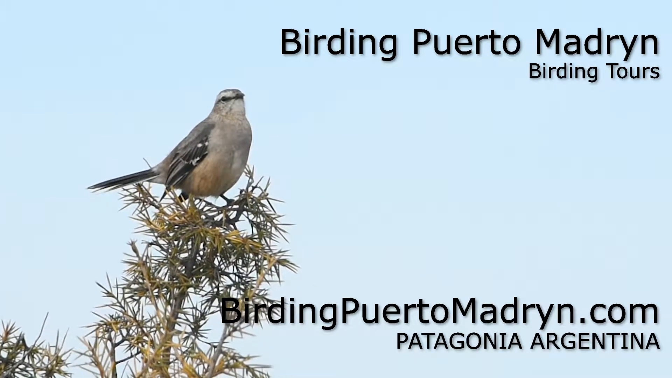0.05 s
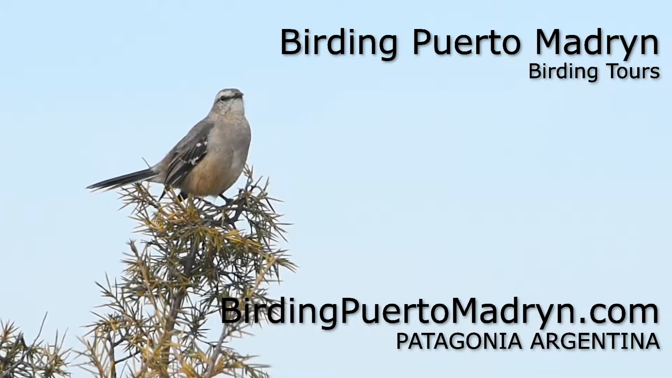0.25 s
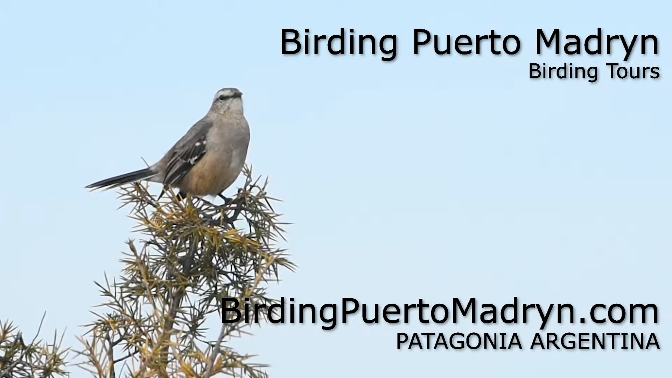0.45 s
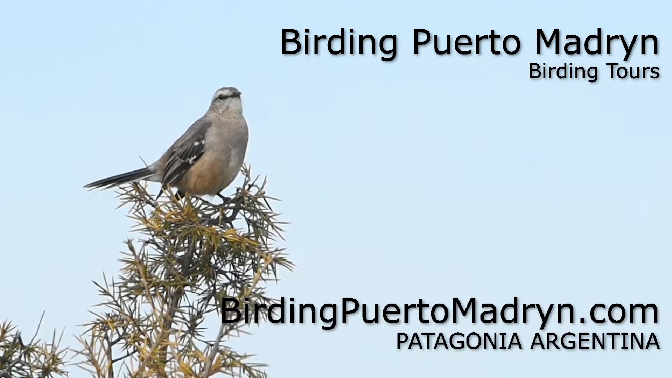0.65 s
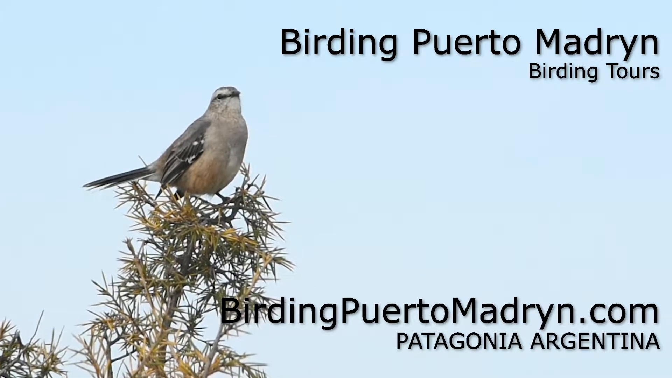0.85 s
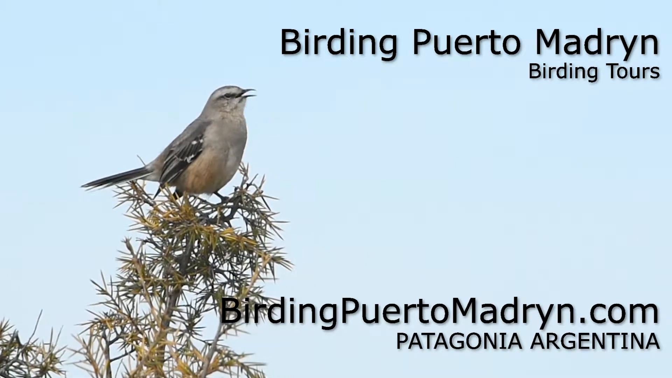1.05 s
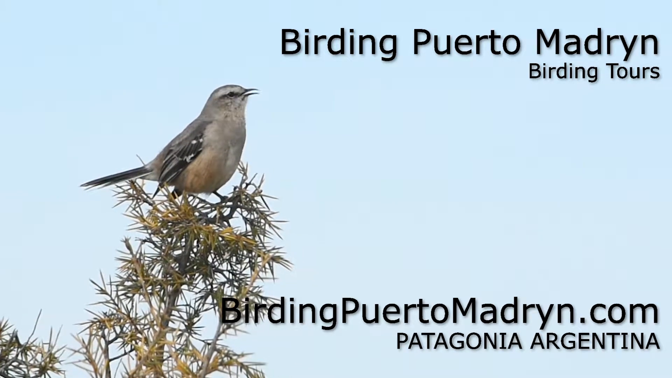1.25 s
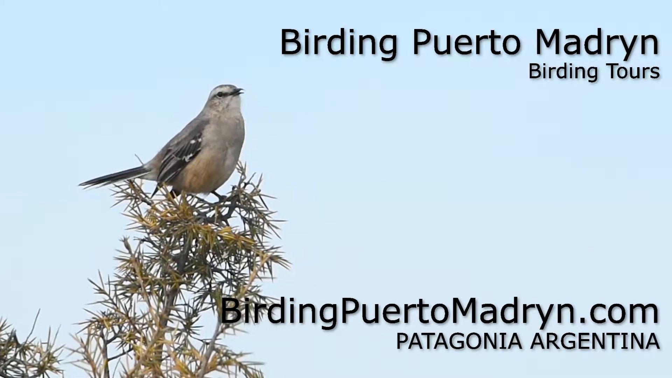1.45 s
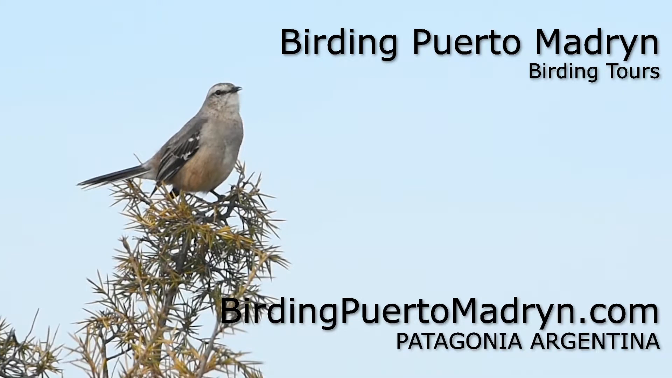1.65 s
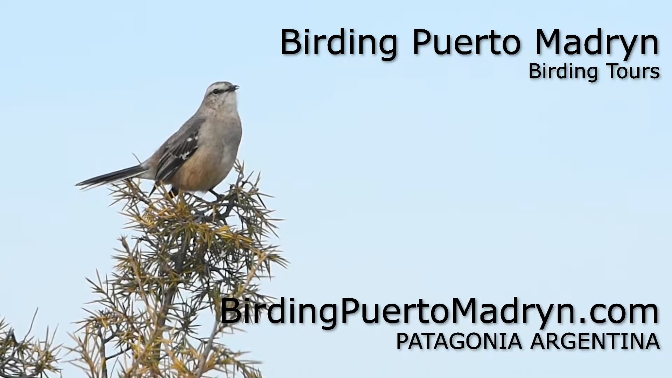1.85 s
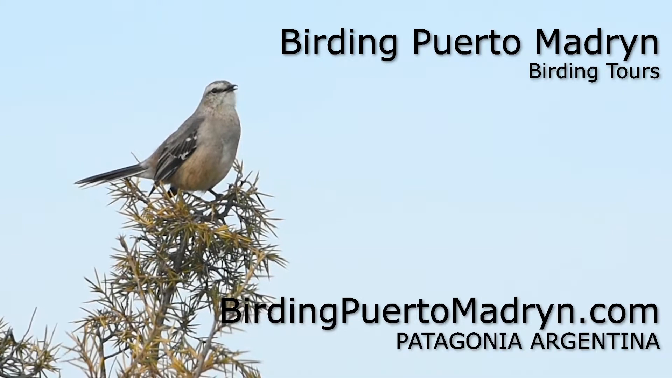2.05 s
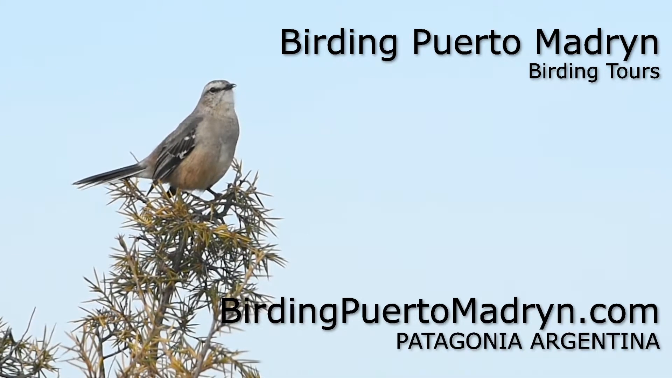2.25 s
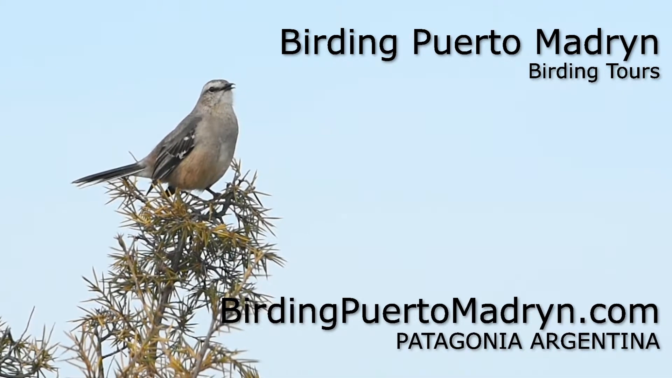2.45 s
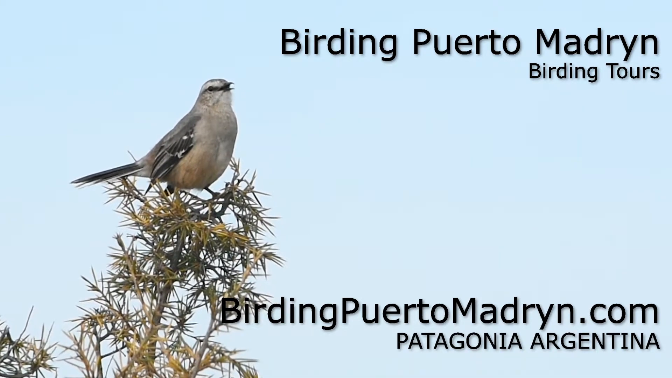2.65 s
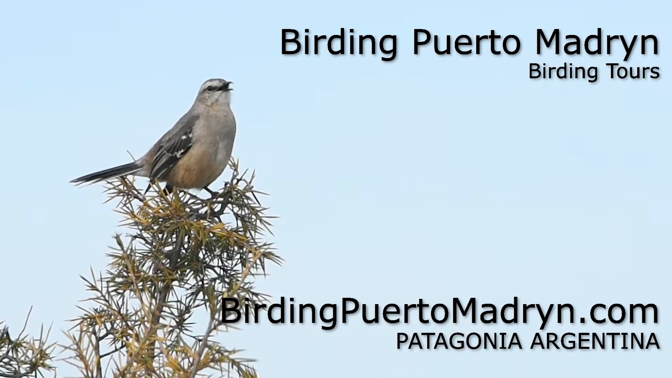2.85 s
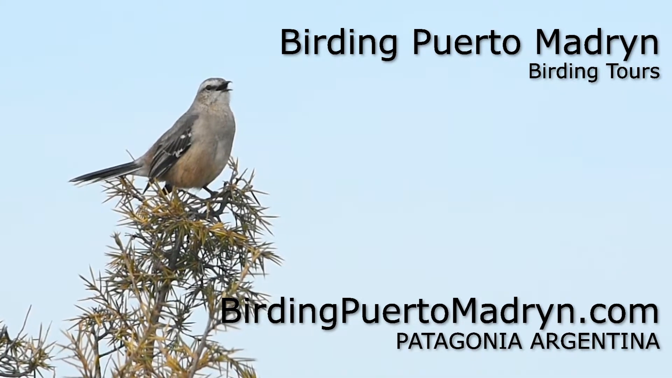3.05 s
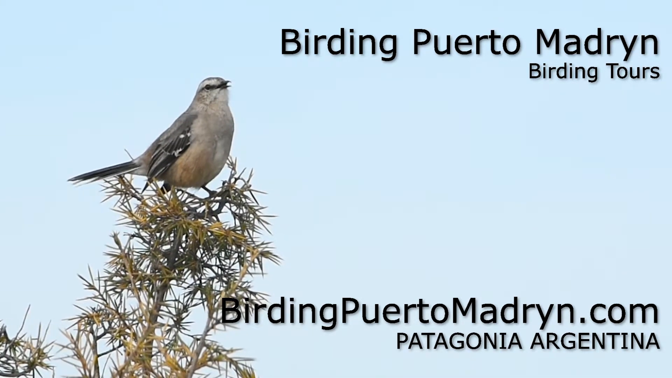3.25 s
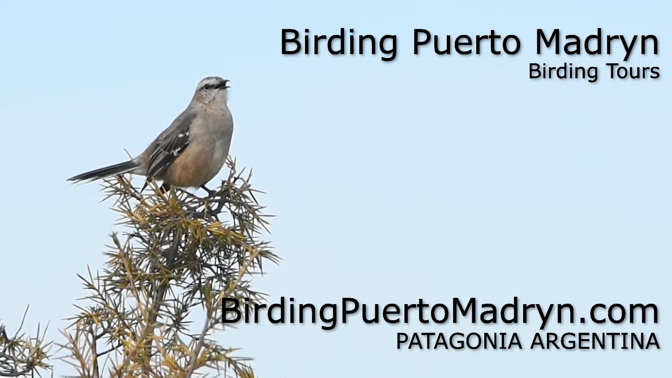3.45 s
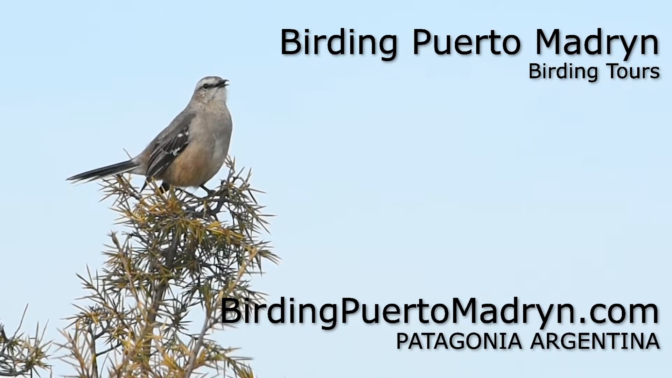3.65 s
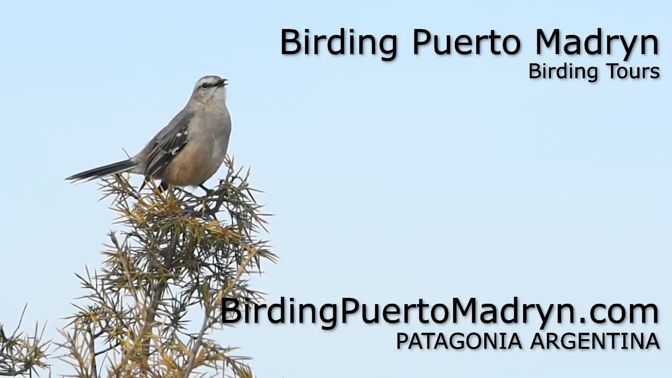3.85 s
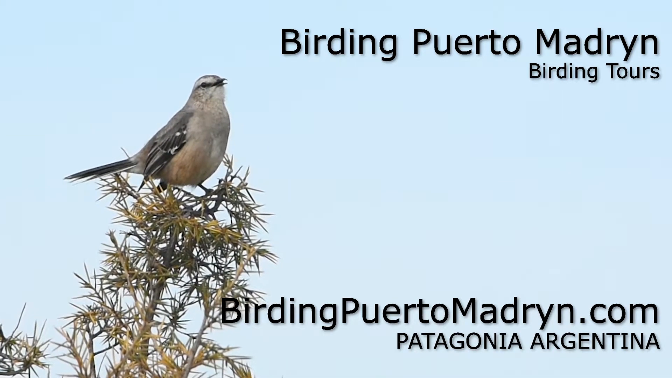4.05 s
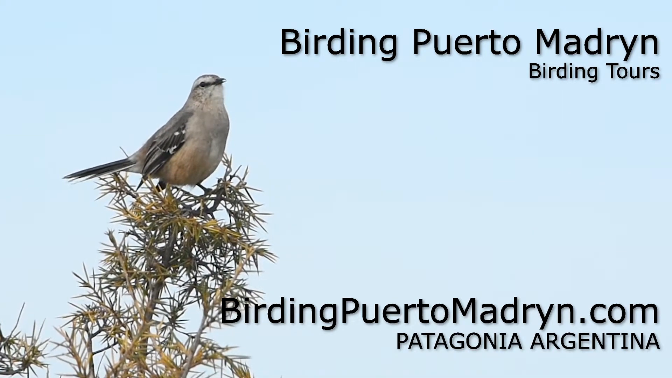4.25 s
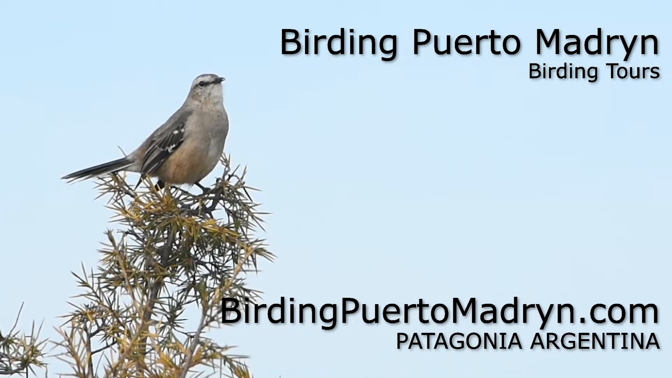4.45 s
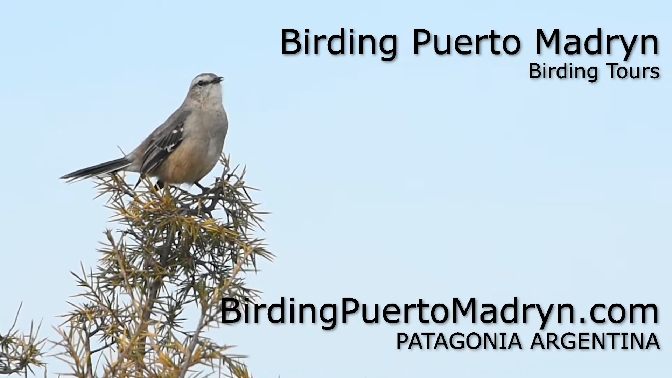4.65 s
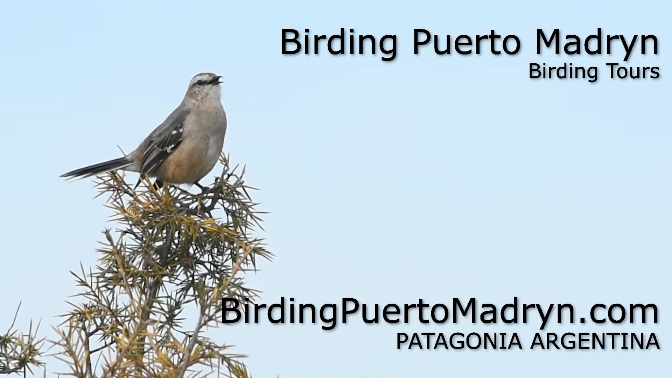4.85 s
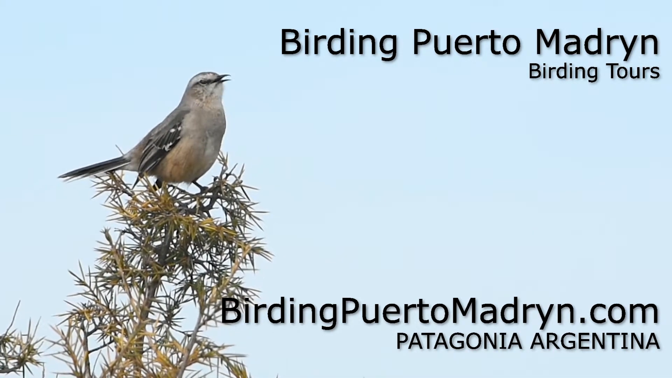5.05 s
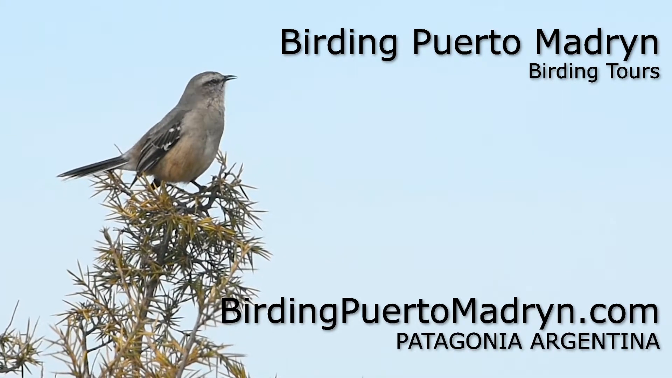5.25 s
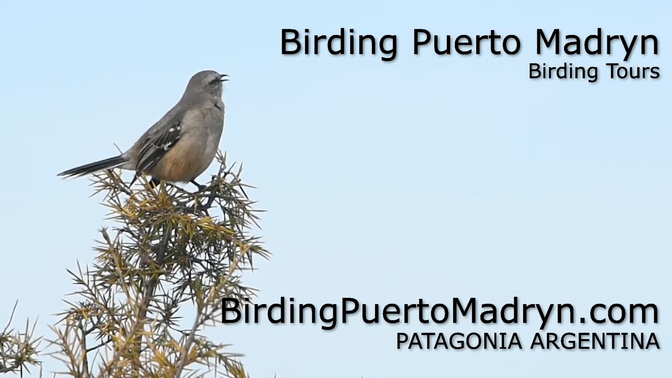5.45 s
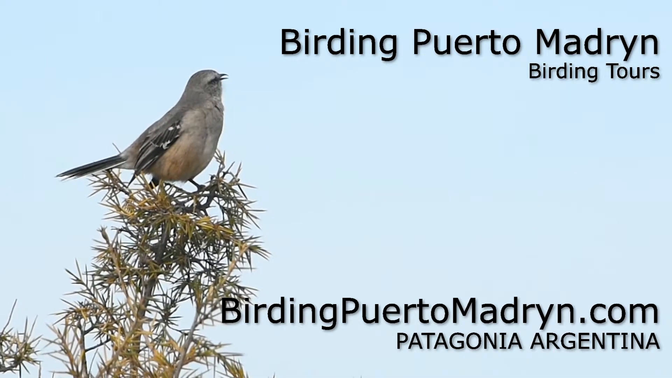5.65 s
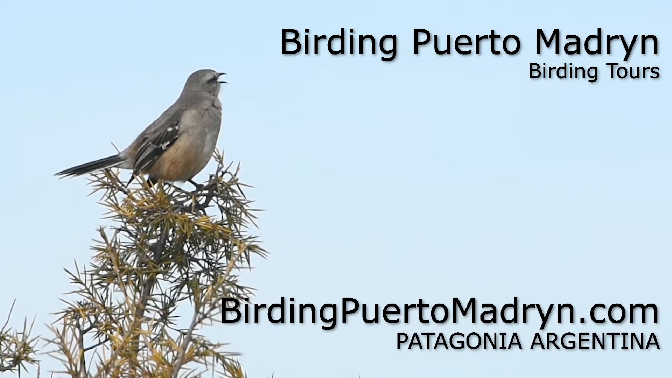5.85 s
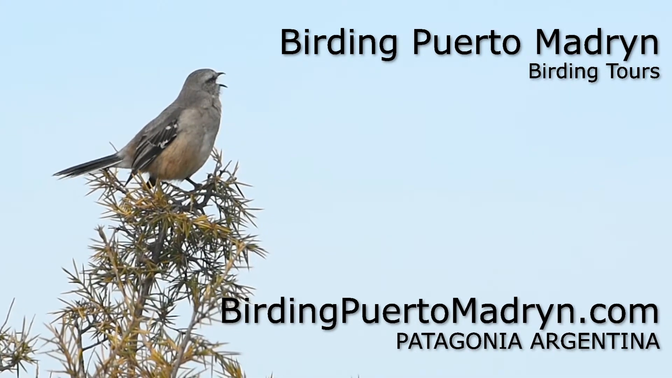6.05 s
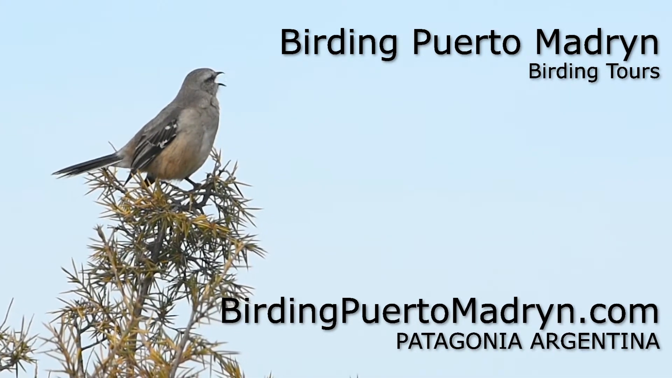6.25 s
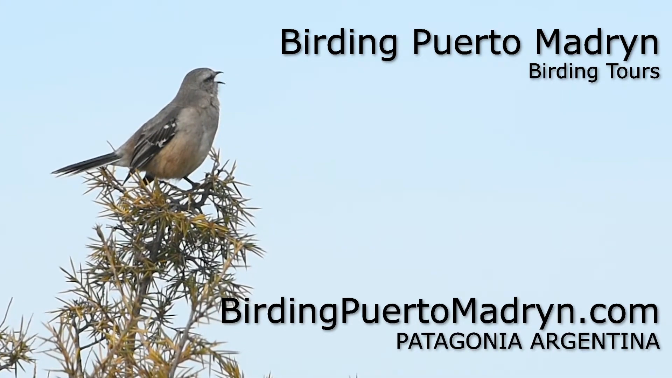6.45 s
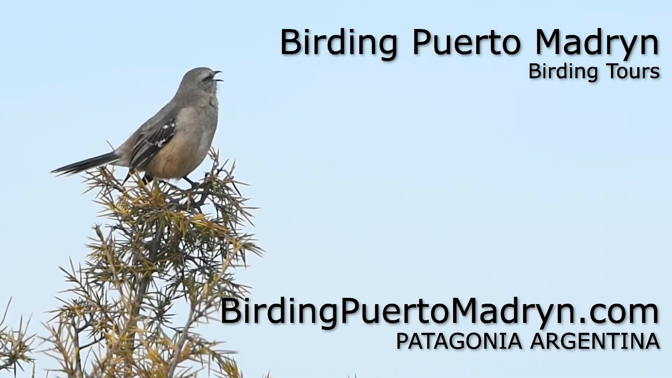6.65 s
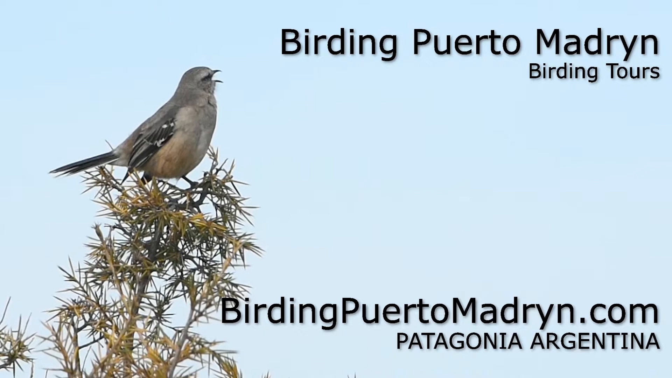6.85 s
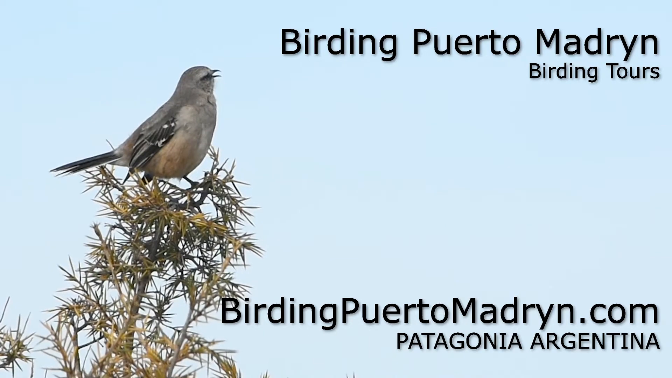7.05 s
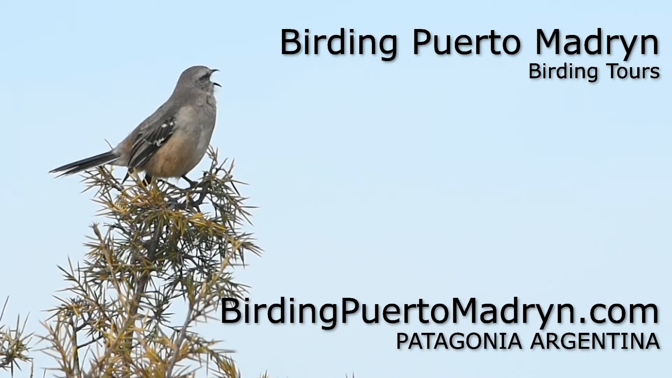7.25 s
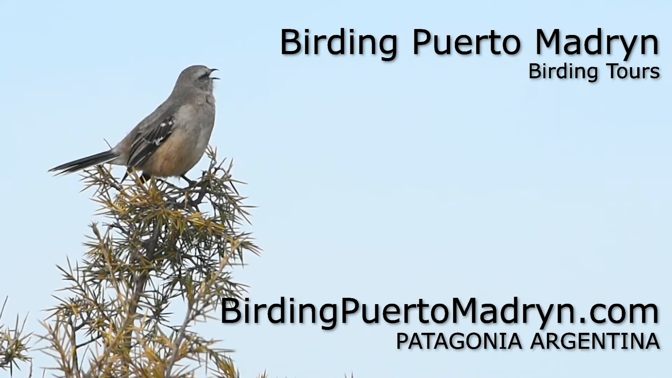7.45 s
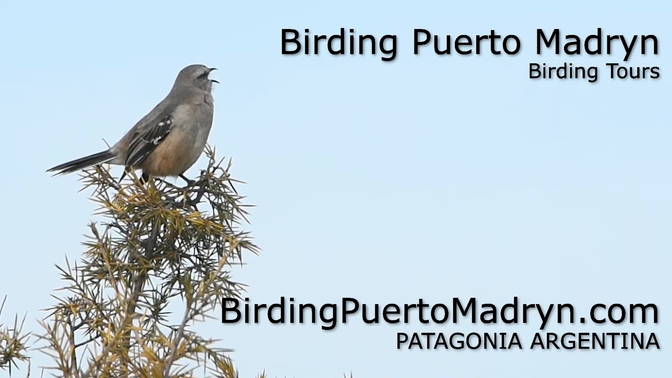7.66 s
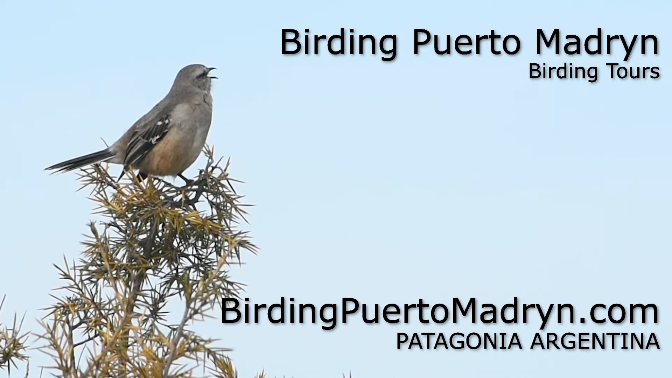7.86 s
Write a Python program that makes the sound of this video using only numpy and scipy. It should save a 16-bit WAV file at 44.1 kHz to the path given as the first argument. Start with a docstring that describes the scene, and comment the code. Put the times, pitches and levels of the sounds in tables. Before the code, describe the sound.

Outdoors in open country, wind rumbles unevenly on the microphone over a soft hiss, and a distant bird gives one faint note. Then a nearer songbird straight ahead begins a varied song: clear whistles around a fast series of ticks, then rough chirrs, sliding notes, grinding rasps and rapid down-and-up whistles. Late in the song, stronger gusts thump from left and right and distort for an instant.

```python
"""Open scrub. The air hisses softly and wind rumbles on the two microphone ports; a faint bird calls far off.
A mockingbird sings from the top of a bush, and the bushes return a faint echo: a low whistle, a run
of ticks, a high whistle, paired chirrs, two slurs, pips leading into rasps, then quick V-shaped swoops.
Its whistles are nearly pure; the rough notes come from the two sides of its syrinx beating together.
Late in the song the gusts hit harder and now and then overload the microphone."""
import sys
import numpy as np
from scipy import signal
from scipy.fft import rfft, irfft
from scipy.io import wavfile
from scipy.ndimage import uniform_filter1d

SR = 44100
rng = np.random.default_rng(int(sys.argv[2]) if len(sys.argv) > 2 else 0)


def file_out(sig):
    """Save sig as 16-bit WAV at sys.argv[1]."""
    # one column per channel
    cols = np.atleast_2d(sig).T
    # limit, then scale
    lim = np.clip(cols, -1, 1)
    pcm = np.round(lim * 32767).astype(np.int16)
    wavfile.write(sys.argv[1], SR, pcm)


N = 348390
TIME = np.arange(N) / SR

# cues for the two-voiced syllables and their lead-ins: start_s, level_db
SLUR_CUES = [(4.315, -22.5), (4.548, -21)]
RASP_CUES = [(4.838, -28.5), (5.139, -28), (5.45, -29), (5.749, -29)]


def from_db(db):
    return 10 ** (np.asarray(db) / 20)


def rms_one(x):
    """Scale each channel to rms 1."""
    return x / np.sqrt(np.mean(x ** 2, axis=-1, keepdims=True) + 1e-20)


def along(rows, t):
    """Every column of a curve, read at times t."""
    s, *columns = np.transpose(rows)
    return [np.interp(t, s, c) for c in columns]


def at_hz(points, hz):
    """Every column of a spectrum, read on a log-frequency axis."""
    f, *columns = np.transpose(points)
    return [np.interp(np.log(hz + 1e-9), np.log(f), c) for c in columns]


def butter(x, hz, kind, order=2):
    """Causal Butterworth filter."""
    return signal.sosfilt(signal.butter(order, hz, kind, fs=SR, output="sos"), x)


def drift(hz):
    """Smooth random modulation of rms 1, up to about hz."""
    return rms_one(butter(rng.standard_normal(N), hz, "low"))


def add(track, start, sound):
    """Mix a sound into a track."""
    i = int(start * SR)
    track[i:i + len(sound)] += sound[:N - i]


def cycle(hz):
    """Running phase of an oscillator."""
    return 2 * np.pi * np.cumsum(hz) / SR


def air(level_db=-44.0):
    """A bed of soft, steady hiss, unrelated in the two channels."""
    # tone of still air: frequency_hz, relative_db
    colour = [(150, -0.5), (400, -6), (1200, -9), (4200, -12), (9000, -16.5), (16000, -22.5)]
    spectrum_db, = at_hz(colour, np.fft.rfftfreq(N, 1 / SR))
    white = rng.standard_normal((2, N))
    return from_db(level_db) * rms_one(irfft(rfft(white) * from_db(spectrum_db), N))


def flow_db(breeze_gain_db=7.0, attack_s=0.016, release_s=0.031):
    """Strength of the wind at each port: gusts swell, hold and die away on top of the breeze."""
    # the breeze's envelope: time_s, relative_db
    breeze = [(0.0, -38), (0.68, -34), (1.1, -47.5), (2.24, -50.5), (3.7, -39), (4.51, -47.5),
              (4.77, -28.5), (5.35, -36), (5.92, -34), (6.51, -21.5), (7.03, -38.5), (7.5, -29), (7.9, -40)]
    # separate gusts: start_s, length_s, level_db, left_over_right_db
    gusts = [(0.098, 0.14, -21.5, 15), (0.448, 0.19, -23, 7.5), (0.741, 0.13, -25, 0),
             (1.011, 0.098, -23.5, -0.5), (1.531, 0.1, -30, 8), (2.539, 0.086, -31, 0.5),
             (3.02, 0.12, -28.5, 4), (4.615, 0.17, -11.5, -3.5), (4.941, 0.18, -22, -1),
             (5.465, 0.12, -17.5, 2.5), (5.58, 0.047, -8.5, -6), (6.239, 0.46, -12.5, 1.5),
             (6.831, 0.026, -13.5, -20), (7.168, 0.074, -25, -5), (7.403, 0.29, -16.5, -5)]
    power = from_db(along(breeze, TIME)[0] + breeze_gain_db) ** 2
    for start, length, db, side_db in gusts:
        away = np.maximum((start - TIME) / attack_s, (TIME - start - length) / release_s)
        pan = from_db([[side_db], [-side_db]])
        power = power + from_db(db) ** 2 * pan / pan.mean() * np.exp(-2 * np.clip(away, 0, 20))
    return 10 * np.log10(power)


def wind(gain_db=-0.5, lump_db=2.5, lump_hz=14, reference_db=-21.0):
    """Each port rumbles with its own lumpy eddies; harder gusts are also brighter."""
    # tone of the rumble at the reference strength: frequency_hz, relative_db, extra_db_per_wind_db
    colour = [(15.6, -7, -0.98), (49.9, 10, 0.58), (91.4, 2, 0.73), (137.4, -12.5, 1.7), (262, -31.5, 1),
              (644, -53.5, 0.44)]
    port_db = flow_db() + lump_db * np.array([drift(lump_hz), drift(lump_hz)])
    white = rng.standard_normal((2, 2, N))
    edges_hz = np.geomspace(14, 1100, num=12)
    rumble = np.zeros((2, N))
    for k, (low, high) in enumerate(zip(edges_hz, edges_hz[1:])):
        band_db, brighten = at_hz(colour, np.sqrt(low * high))
        band = butter(white[k % 2], [low, high], "band", order=3)
        rumble += band * from_db(band_db + brighten * (port_db - reference_db))
    levelled = rumble / np.sqrt(uniform_filter1d(rumble ** 2, size=3000) + 1e-20)
    return levelled * from_db(port_db + gain_db)


def syrinx(hz, db, second_db=-33, third_db=-40, edge_s=0.00016):
    """The bird's voice: a nearly pure tone with weak overtones, faded in and out."""
    phase, t = cycle(hz), np.arange(len(hz)) / SR
    gate = np.sin(np.pi / 2 * np.clip(np.minimum(t, t[-1] - t) / edge_s, 0, 1)) ** 2
    tone = np.sin(phase) + from_db(second_db) * np.sin(2 * phase) + from_db(third_db) * np.sin(3 * phase)
    return np.sqrt(2) * from_db(db) * gate * tone


def whistle(contour, quaver=0.0036, quaver_hz=130, second_db=-44):
    """One held, gliding note with a slight quaver."""
    out = np.zeros(N)
    t = np.arange(contour[0][0], contour[-1][0], 1 / SR)
    hz, db = along(contour, t)
    vibrato = 1 + quaver * np.sin(2 * np.pi * quaver_hz * t)
    add(out, t[0], syrinx(hz * vibrato, db, second_db=second_db))
    return out


def far_bird():
    """One faint, rising whistle from further off."""
    # the note: time_s, pitch_hz, level_db
    contour = [(.165, 2140, -67), (.2, 2300, -42), (.235, 2350, -56)]
    return whistle(contour, quaver=0.034)


def buffets():
    """Single eddies thump one port, each a pull and a push."""
    # the hits: centre_s, peak_amplitude, swing_s, channel
    hits = [(.215, 0.38, 0.0022, 0), (0.641, 0.38, 0.0021, 0), (4.619, 1.55, 0.0024, 1),
            (4.698, 0.85, 0.0027, 1), (4.716, 1.24, 0.0021, 0), (4.768, 0.97, .0018, 1),
            (5.595, 0.64, 0.00096, 1), (5.618, 1.28, 0.0014, 1), (6.236, 0.54, 0.00097, 1),
            (6.321, 1.16, 0.003, 0), (6.351, 1.1, 0.00171, 1), (6.482, 2.06, 0.00239, 0),
            (6.52, 1.42, 0.0025, 0), (6.549, 3.65, 0.00189, 0)]
    out = np.zeros((2, N))
    for centre, peak, swing_s, channel in hits:
        u = (TIME - centre) / swing_s
        out[round(channel)] += peak * u * np.exp((1 - np.minimum(u ** 2, 100)) / 2)
    return out


def whistles():
    """A low, falling whistle before the ticks and a high, scooping one after them."""
    # the two notes: time_s, pitch_hz, level_db
    low_note = [(1.213, 4230, -39), (1.223, 3460, -28.5), (1.235, 3304, -26.5), (1.261, 3430, -34),
                (1.277, 3350, -42), (1.289, 2920, -31.5), (1.309, 2726, -18), (1.335, 2560, -20.5),
                (1.348, 2490, -49)]
    high_note = [(2.822, 7200, -49), (2.838, 6860, -36), (2.858, 5420, -30.5), (2.876, 4820, -33),
                 (2.897, 5140, -66), (2.917, 5210, -36), (2.927, 5640, -27), (2.944, 6760, -57)]
    return whistle(low_note) + whistle(high_note, quaver=0.013, second_db=-17.0)


def rough_voice(gesture, cues, buzz_hz, swing_hz, octave_db, octave_fade_db_per_s=0):
    """One side of the syrinx beats unevenly on the other, shaking pitch and level under a clean octave."""
    out = np.zeros(N)
    beat = cycle(buzz_hz * (1 + 0.54 * drift(313.8)))
    shake = drift(610)
    t = np.arange(gesture[0][0], gesture[-1][0], 1 / SR)
    hz, db, roughness = along(gesture, t)
    for start, level_db in cues:
        at = ((start + t) * SR).astype(int)
        tremolo = rms_one(1 + roughness * np.cos(beat[at] + 2.11))
        sung_hz = hz * rng.normal(1, 0.0212)
        wobble_hz = swing_hz * roughness * (np.cos(beat[at]) + .5 * shake[at])
        voice = syrinx(sung_hz + wobble_hz, db + level_db)
        octave = syrinx(2 * sung_hz, db + level_db + octave_db - octave_fade_db_per_s * t)
        add(out, start + t[0], tremolo * voice + octave)
    return out


def ticks():
    """Two voices at once: a clean up-and-down flick over a low creak."""
    # the run of ticks: start_s, level_db
    cues = [(1.518, -26), (1.644, -26.5), (1.769, -26), (1.899, -24.5), (2.015, -24.5), (2.15, -24.5),
            (2.279, -21), (2.409, -22.5), (2.539, -23.5), (2.661, -23)]
    # lower voice: offset_s, pitch_hz, relative_db, roughness (0-1)
    creak = [(.008, 1972, -14, 0.24), (.014, 2044, -2, 0.76), (.020, 1837, -4, 0.91), (.024, 1700, -13, .7),
             (.032, 2036, -9, 0.87)]
    # upper voice: offset_s, pitch_hz, relative_db
    flick = [(0, 1760, -10), (.003, 2198, -10), (.009, 3330, -16.5), (.014, 2809, -42), (.021, 1900, 3),
             (.025, 1415, -4.5)]
    out = rough_voice(creak, cues, buzz_hz=489, swing_hz=408, octave_db=-30.0)
    hz, db = along(flick, np.arange(0, flick[-1][0], 1 / SR))
    for start, level_db in cues:
        add(out, start, syrinx(hz * rng.normal(1, 0.0249), db + level_db))
    return out


def chirr_gesture(crest_s, length_s=0.069, top_hz=3083, end_hz=1852, bend=2.2):
    """One chirr warbles and clears as it falls. Rows: offset_s, pitch_hz, relative_db, roughness."""
    attack_s, release_s, edge_db = 0.013, 0.0096, -12
    warble_hz, swing_hz, dip_db, settled_s = 64.4, 546, 7.5, 0.0572
    t = np.arange(0, length_s, 1 / SR)
    age = t / length_s
    warbling = np.clip(np.minimum(t, settled_s - t) * warble_hz * 2, 0, 1)
    crest = np.cos(2 * np.pi * warble_hz * (t - crest_s))
    hz = top_hz + (end_hz - top_hz) * age ** bend + swing_hz * warbling * crest * (1 - age)
    closed = 1 - np.clip(np.minimum(t / attack_s, (length_s - t) / release_s), 0, 1)
    db = edge_db * closed - dip_db * age * warbling * (1 + crest)   # the voice ducks on each crest
    roughness = np.interp(age, [0, 1], [0.93, 0.53])
    return np.transpose([t, hz, db, roughness])


def chirrs(level_db=-21, crest_s=0.016, spit_db=-44, spit_s=0.012):
    """Warbling falls, each begun with a spit of turbulent air and a bright octave that soon fades."""
    starts_s = [3.052, 3.226, 3.46, 3.643, 3.892, 4.062]
    spit = sum(np.exp(-((TIME - start - crest_s) / spit_s) ** 2 / 2) for start in starts_s)
    hiss = rms_one(butter(rng.standard_normal(N), [3300, 10500], "band"))
    voice = rough_voice(chirr_gesture(crest_s), [(start, level_db) for start in starts_s],
                        buzz_hz=565.4, swing_hz=330, octave_db=-21.0, octave_fade_db_per_s=332)
    return voice + from_db(spit_db) * spit * hiss


def lead_ins(cues, ahead_s, relative_db, pitch_hz=1600, length_s=0.019):
    """A soft reedy note with a strong octave comes just before a syllable."""
    out = np.zeros(N)
    hz = pitch_hz + np.linspace(40, -40, int(length_s * SR))
    for start, db in cues:
        add(out, start - ahead_s, syrinx(hz, db + relative_db, second_db=-14.0, edge_s=0.0061))
    return out


def duet(gesture, cues, throb_hz, quicken_s, crest_s, lag_rad, swing_hz, coupling, rasp, beak_hz):
    """Both sides of the syrinx pull on each other: the lower throbs ever faster, the upper warbles along."""
    dip_db, shake_hz, throat_hz = 10, 120, 1350
    out, pace, grit = np.zeros(N), drift(25.7), drift(1070)
    low_shake, high_shake = shake_hz * drift(420), shake_hz * drift(420)
    t = np.arange(0, gesture[-1][0], 1 / SR)
    low_hz, low_db, high_hz, high_db = along(gesture, t)
    friction = np.minimum(from_db(high_db - low_db), 1)   # the lower voice alone stays clean
    for start, level_db in cues:
        at = ((start + t) * SR).astype(int)
        rate_hz = throb_hz * (1 + (t / quicken_s) ** 2 + 0.09 * pace[at])
        throb = cycle(rate_hz) - 2 * np.pi * throb_hz * crest_s
        low = low_hz - swing_hz * np.sin(throb) / 2 + low_shake[at]
        high = high_hz + swing_hz * np.cos(throb - lag_rad) + high_shake[at]
        pull_hz = coupling * friction * (high - low) * np.cos(cycle(high - low))
        lower = syrinx(low + pull_hz, level_db + low_db - dip_db * np.sin(throb / 2) ** 4)
        upper = syrinx(high + pull_hz, level_db + high_db, second_db=-25)
        add(out, start, (lower + upper) * (1 + rasp * friction * grit[at]))
    return butter(butter(out, throat_hz, "high", order=4), beak_hz, "low", order=4)


def slurs():
    """Two lightly grainy voices slide down and close in on each other."""
    # one slur: offset_s, lower_hz, lower_db, upper_hz, upper_db
    gesture = [(0, 1997, -25, 2760, -9.5), (.013, 1929, -6.5, 2599, -4), (.028, 2010, -2, 2403, -6),
               (.055, 1880, -6.5, 2130, -7), (.088, 1647, -20, 1850, -22)]
    return duet(gesture, SLUR_CUES, throb_hz=78.2, quicken_s=0.0884, crest_s=0.0015, lag_rad=0,
                swing_hz=190, coupling=0.18, rasp=0.23, beak_hz=8000)


def pips(level_db=-21, pitch_hz=1790, fall_hz=340, length_s=0.012, first_db=-3.0):
    """Short trills of rounded, falling pips; the first of each is softer."""
    # the trills: start_s, count, spacing_s
    trills = [(4.763, 2, .014), (5.054, 4, .0113), (5.371, 3, .013), (5.665, 3, .0125)]
    out, age = np.zeros(N), np.linspace(0, 1, int(length_s * SR))
    for start, count, spacing in trills:
        for k in range(round(count)):
            hz = pitch_hz * rng.normal(1, 0.024) + fall_hz * (.5 - age)
            db = level_db + first_db * (k == 0) + rng.normal()
            add(out, start + k * spacing, np.sin(np.pi * age) * syrinx(hz, db))
    return out


def rasps():
    """Two voices hold nearly level and grind against each other."""
    # one rasp: offset_s, lower_hz, lower_db, upper_hz, upper_db
    gesture = [(0, 1927, 3.5, 2779, -12.5), (.026, 2020, 3, 2621, -3), (.08, 2110, 1.5, 2620, -5),
               (.099, 2080, -11, 2630, -16)]
    return duet(gesture, RASP_CUES, throb_hz=88.46, quicken_s=0.098, crest_s=0.0041, lag_rad=2.5,
                swing_hz=212, coupling=0.34, rasp=0.72, beak_hz=3900)


def swoop_voice(hz, husk, second_db=-14, third_db=-20, purer_db_per_khz=7.5):
    """Reedy at its lowest, purer higher up; husky upper overtones light up as they cross a resonance."""
    sheen_db, sheen_hz, width_hz = -22.0, 13000, 1300
    phase = cycle(hz)
    reedy = from_db(-purer_db_per_khz * (hz - hz.min()) / 1000)
    octave = reedy * from_db(second_db) * np.sin(2 * phase)
    sheen = sum(np.exp(-((k * hz - sheen_hz) / width_hz) ** 2) * np.sin(k * phase) for k in range(2, 6))
    upper = reedy * from_db(third_db) * np.sin(3 * phase) + np.sqrt(reedy) * from_db(sheen_db) * sheen
    return np.sqrt(2) * (np.sin(phase) + octave + (1 + husk) * upper)


def swoops(level_db=-27, swell_db=0.96, waver_hz=130, flutter_db=1.6, throat_hz=2450):
    """The pitch hovers softly, dives, turns cleanly and shoots up again; the run grows a little louder."""
    # each swoop, timed at its lowest point: turn_s, top_hz, bottom_hz
    turns = [(6.062, 6110, 2420), (6.214, 5550, 2390), (6.4501, 5770, 2650), (6.585, 5880, 2756),
             (6.784, 6180, 2720), (6.936, 6050, 2514), (7.063, 5800, 2340), (7.285, 5850, 2440),
             (7.427, 5850, 2550), (7.589, 5390, 2486), (7.836, 5460, 2660)]
    lead_s, tail_s, attack_s, release_s = .034, 0.014, 0.017, 0.0041
    dive_s, climb_s, roundness = .0158, .0125, 2.2   # a rounder turn lingers longer
    out, waver, flutter = np.zeros(N), drift(1080), drift(890)
    t = np.arange(-lead_s, tail_s, 1 / SR)
    envelope_db = np.interp(t, [t[0], t[0] + attack_s, t[-1] - release_s, t[-1]], [-21, 0, 0, -14])
    for k, (turn, top_hz, bottom_hz) in enumerate(turns):
        dive, climb = np.array([dive_s, climb_s]) * rng.normal(1, .06, 2)
        at = ((turn + t) * SR).astype(int)
        height = 1 - np.exp(-np.abs(t / np.where(t < 0, dive, climb)) ** roundness)
        hz = bottom_hz + (top_hz - bottom_hz + waver_hz * waver[at]) * height
        db = level_db + swell_db * k / len(turns) + envelope_db + flutter_db * flutter[at]
        add(out, turn + t[0], from_db(db) * swoop_voice(hz, husk=waver[at] / 2))
    return butter(out, throat_hz, "high", order=4)   # the narrowed throat weakens the low turn


def scrub_echo(song, near_db=-17.5, near_s=0.049, far_db=-21, far_t60_s=1.0, build_s=0.15):
    """Twigs scatter the highs at once; bushes further off answer later and duller."""
    t = np.arange(SR) / SR
    twigs, bushes = rng.standard_normal((2, 2, SR)) + rng.standard_normal((2, 1, SR))
    near = butter(twigs, 3000, "high") * np.exp(-t / near_s) * (t > .002)
    far = butter(bushes, 4200, "low") * from_db(-60 * t / far_t60_s) * (1 - np.exp(-t / build_s))
    response = (from_db(near_db) * rms_one(near) * 2 + from_db(far_db) * rms_one(far) / 2) / np.sqrt(SR)
    return signal.fftconvolve(song[None], response)[:, :N]


def mockingbird(throat_hz=2080, beak_hz=9000):
    """The whole song, shaped by throat and beak, echoed by the scrub and coloured by the microphone."""
    # the microphone's response towards the bird: centre_hz, width_hz, depth (0-1, negative for a peak)
    dips = [(2980, 130, 1), (3330, 75, -0.34), (3580, 120, 0.98), (4360, 114, 0.99), (4700, 190, -0.71),
            (5280, 74, 0.78)]
    song = whistles() + ticks() + chirrs() + pips() + swoops()
    song += lead_ins(SLUR_CUES, ahead_s=0.0096, relative_db=-8.0)
    song += lead_ins(RASP_CUES, ahead_s=0.021, relative_db=-1.5)
    song = butter(butter(song, throat_hz, "high", order=4), beak_hz, "low", order=1)
    song += slurs() + rasps()   # these bring their own throat and beak filters
    heard = song + scrub_echo(song)
    for hz, width_hz, depth in dips:
        heard = heard - depth * signal.lfilter(*signal.iirpeak(hz, hz / width_hz, fs=SR), heard)
    return heard


def scene():
    """The singer straight ahead, a faint bird further off, wind and air."""
    return mockingbird() + far_bird() + wind() + buffets() + air()


def record(dry, cutoff_hz=15950):
    """Gusts clip at full scale; a steep low-pass cuts the top."""
    clipped = np.clip(dry, -1, 1)
    return signal.sosfilt(signal.ellip(12, .05, 80, cutoff_hz, fs=SR, output="sos"), clipped)


dry = scene()
out = record(dry)
file_out(out)
```